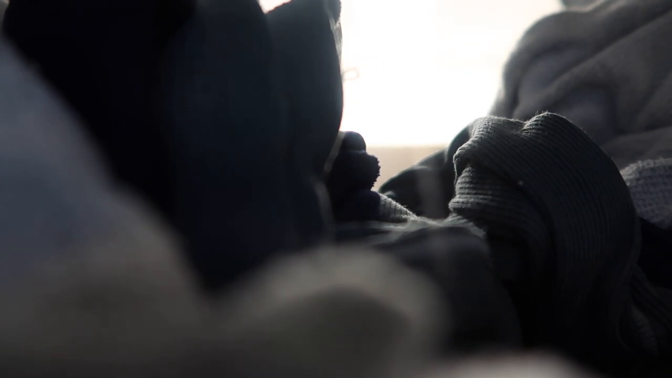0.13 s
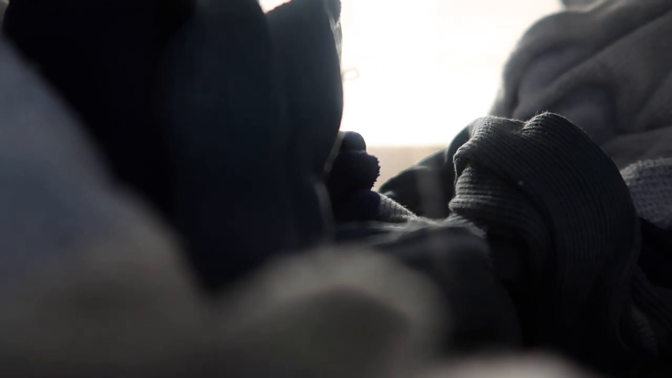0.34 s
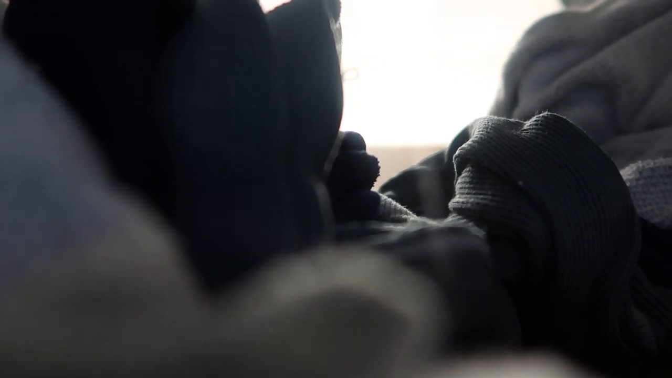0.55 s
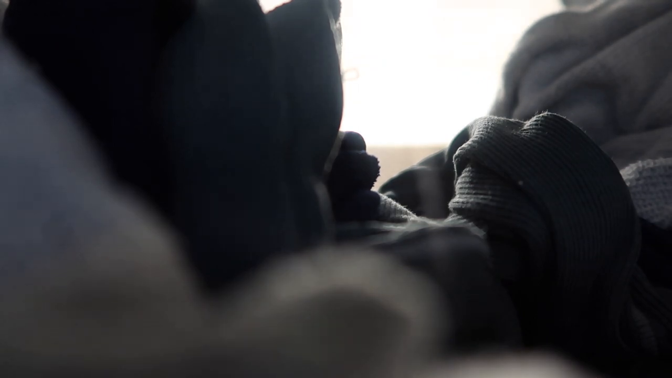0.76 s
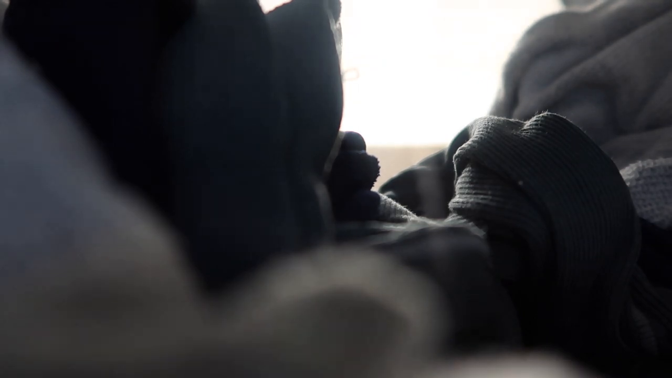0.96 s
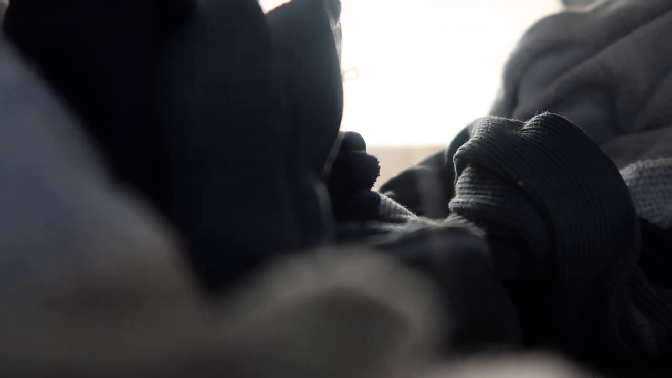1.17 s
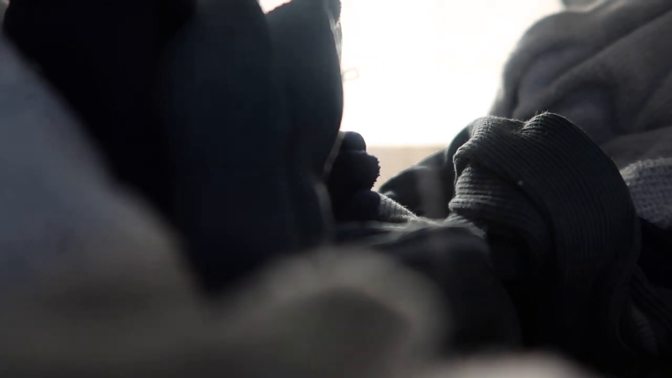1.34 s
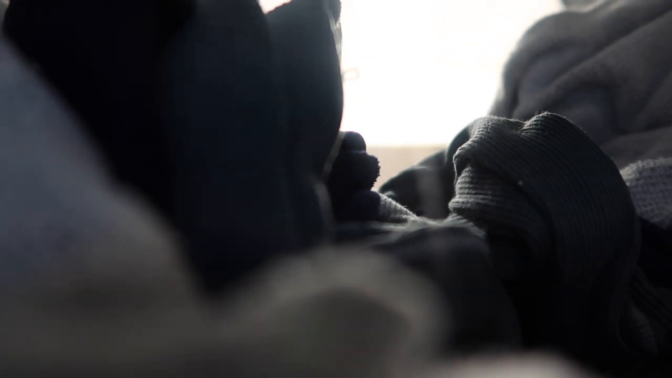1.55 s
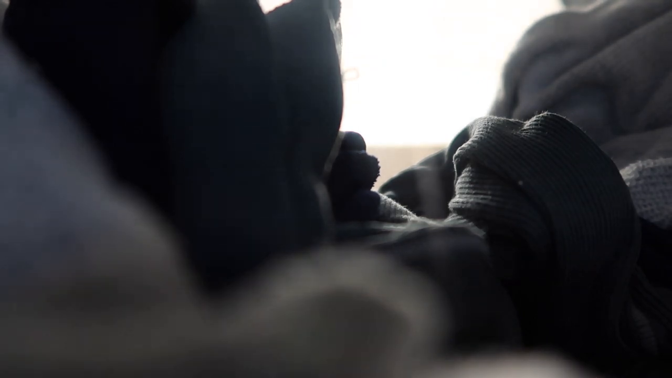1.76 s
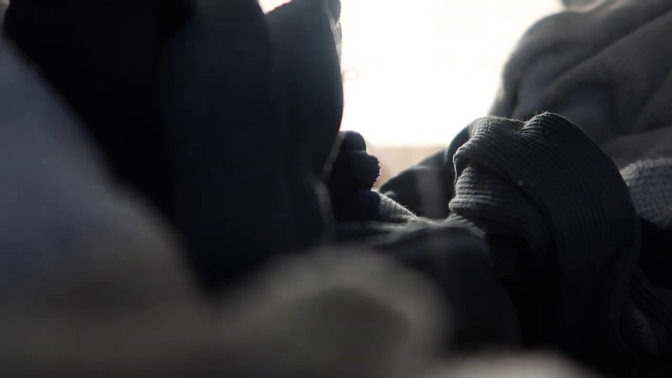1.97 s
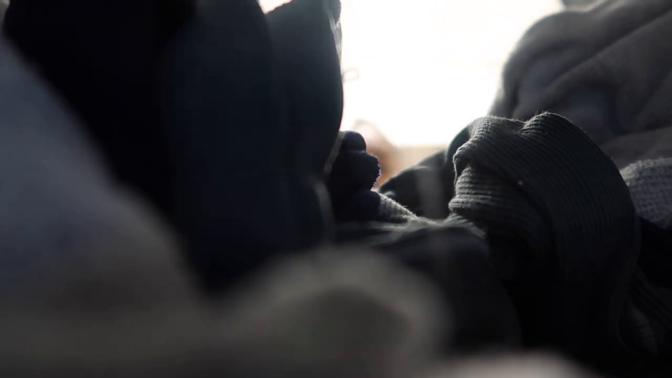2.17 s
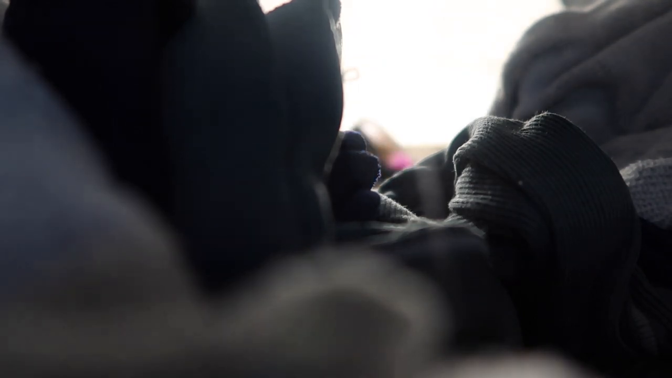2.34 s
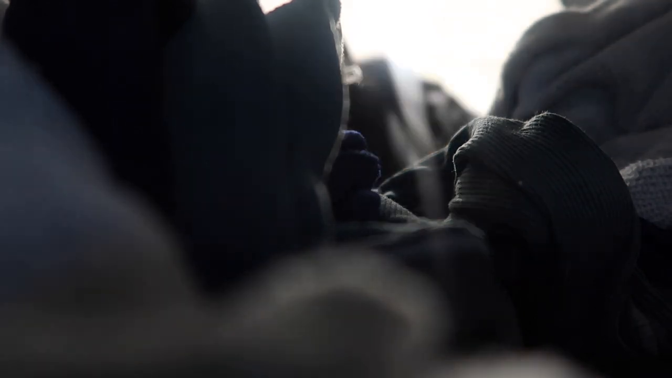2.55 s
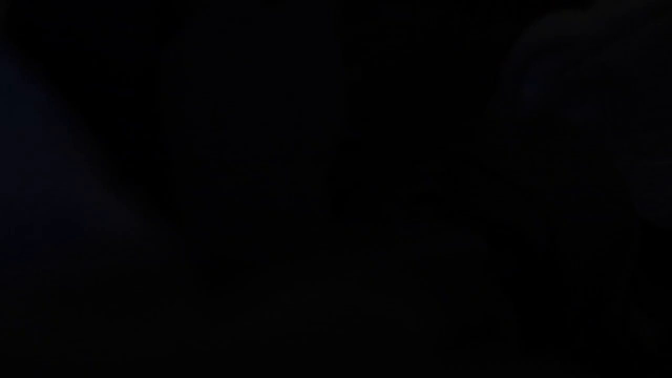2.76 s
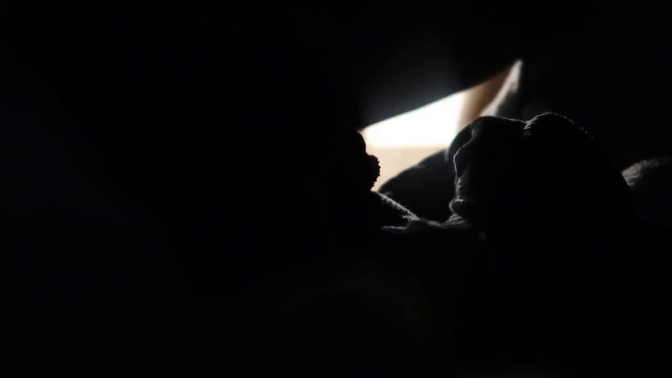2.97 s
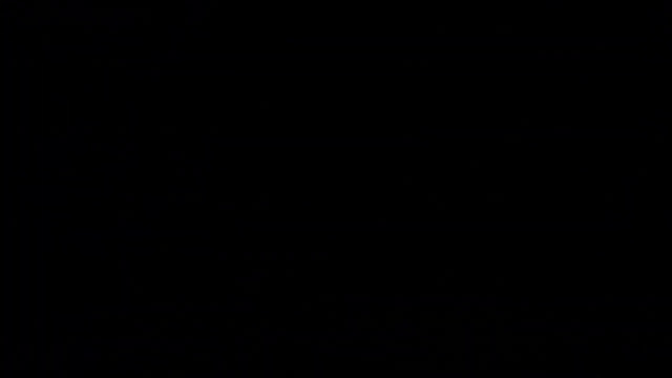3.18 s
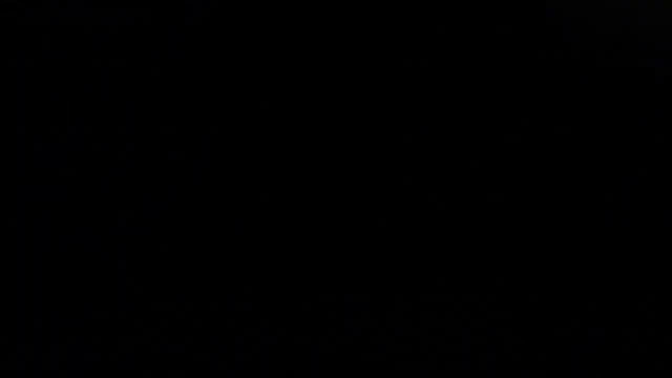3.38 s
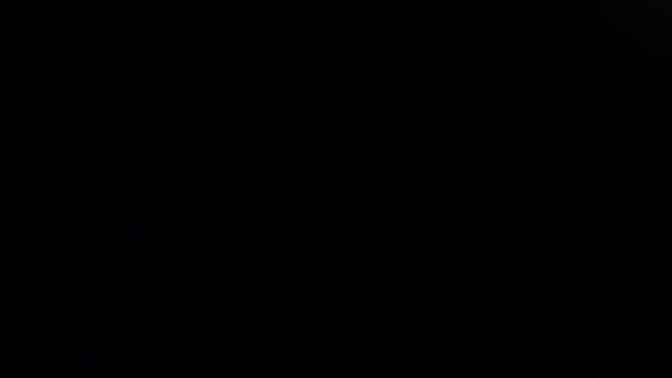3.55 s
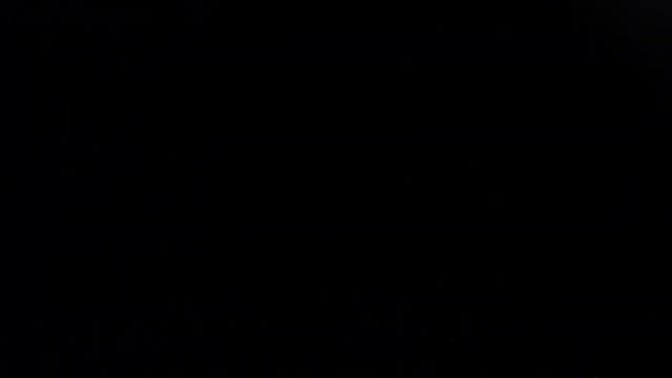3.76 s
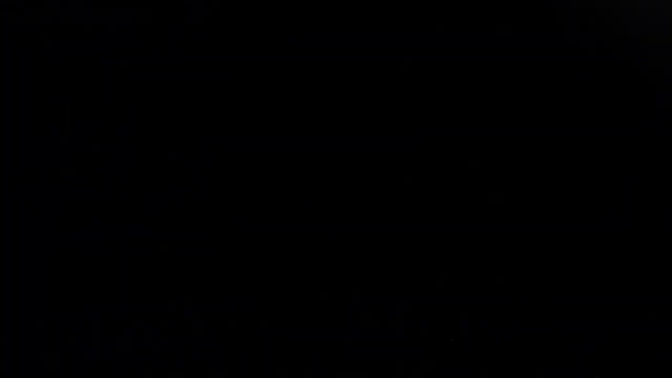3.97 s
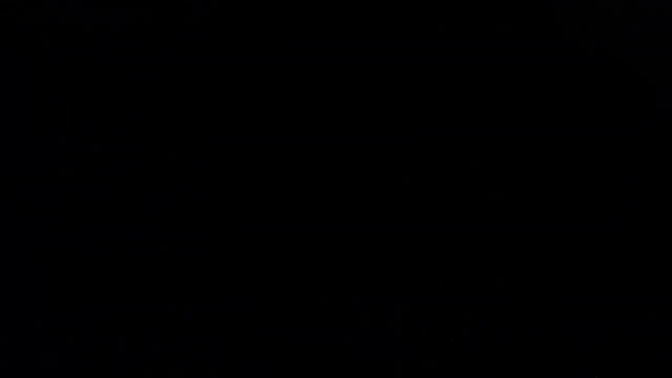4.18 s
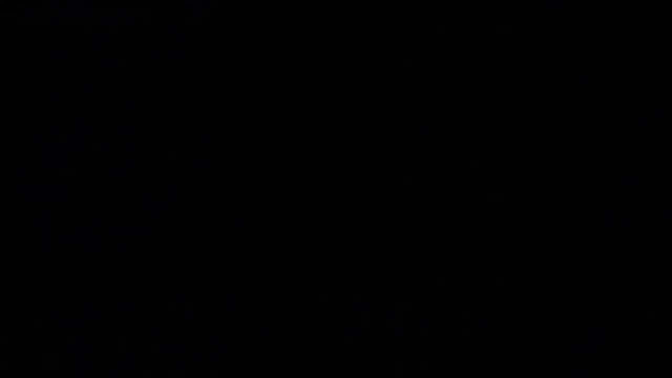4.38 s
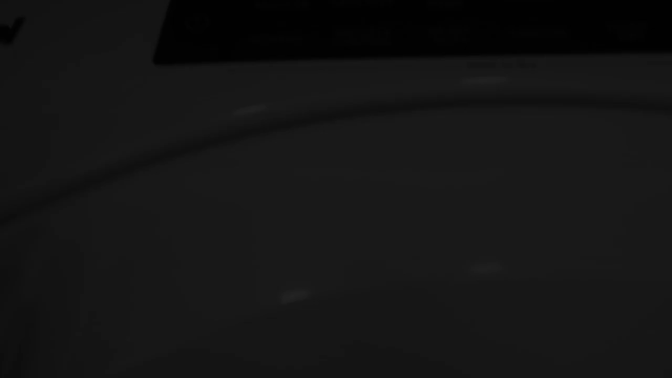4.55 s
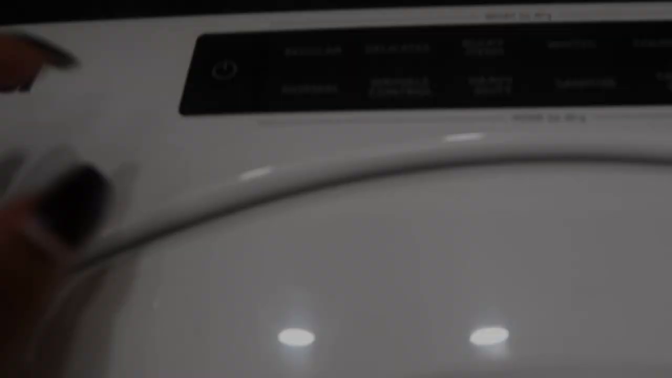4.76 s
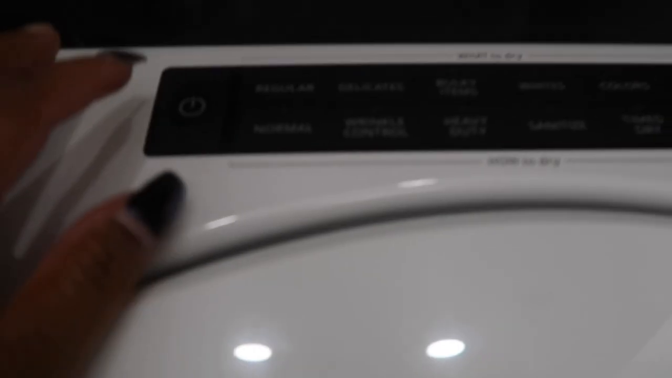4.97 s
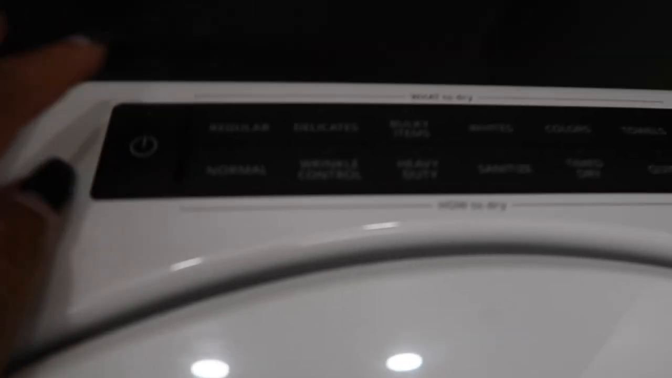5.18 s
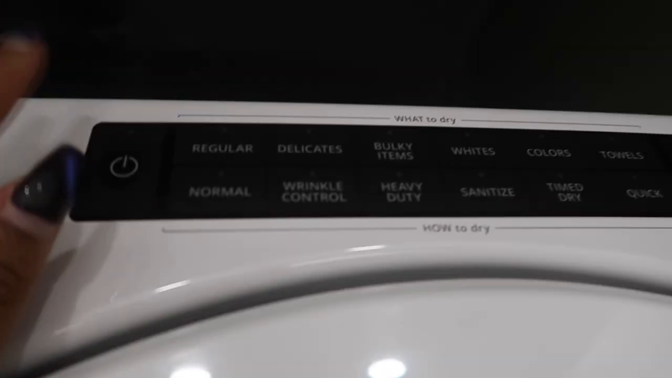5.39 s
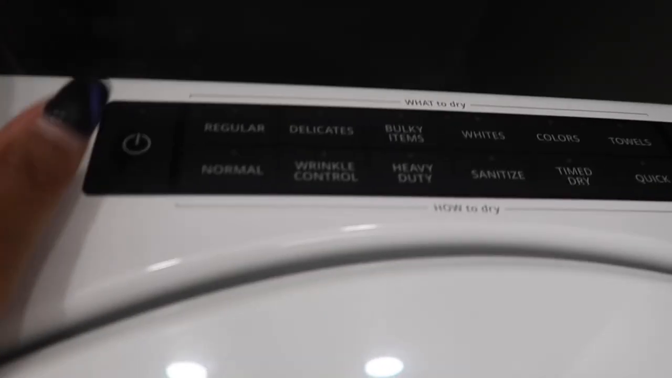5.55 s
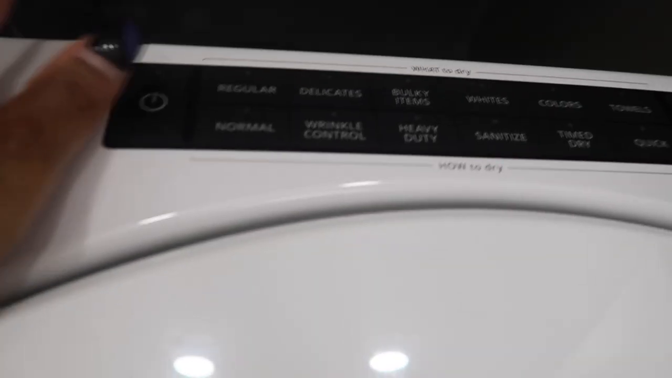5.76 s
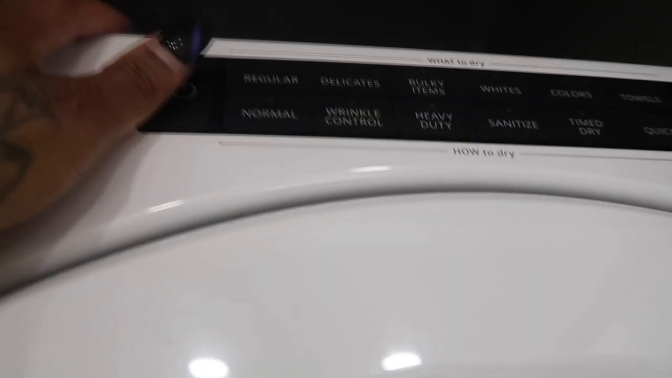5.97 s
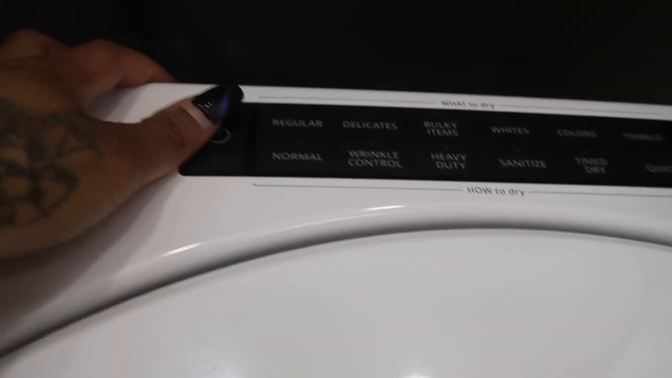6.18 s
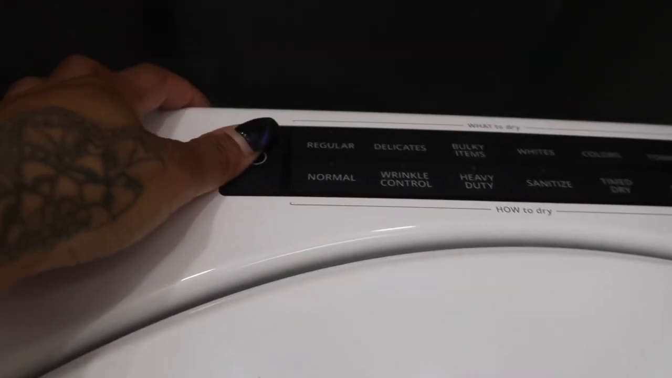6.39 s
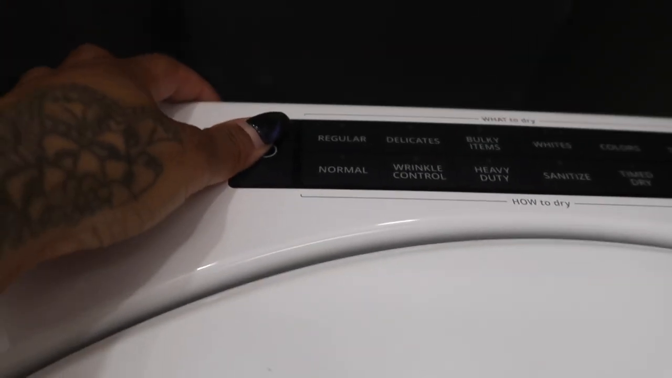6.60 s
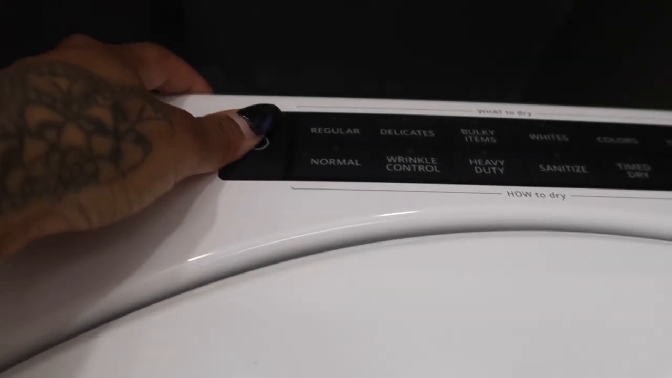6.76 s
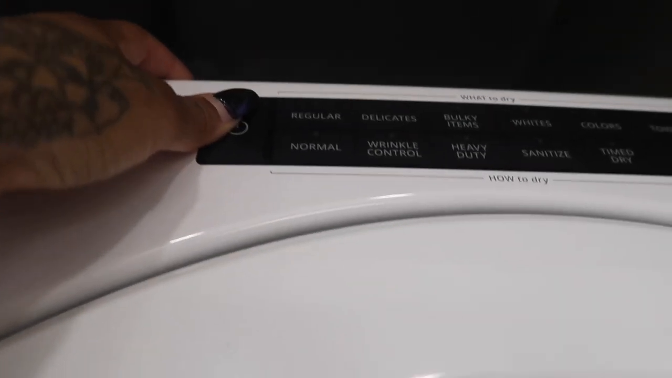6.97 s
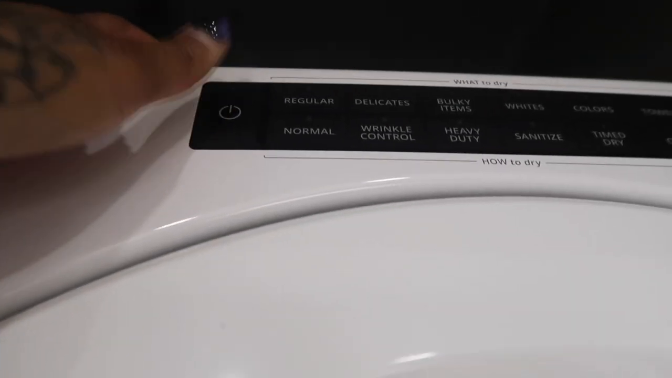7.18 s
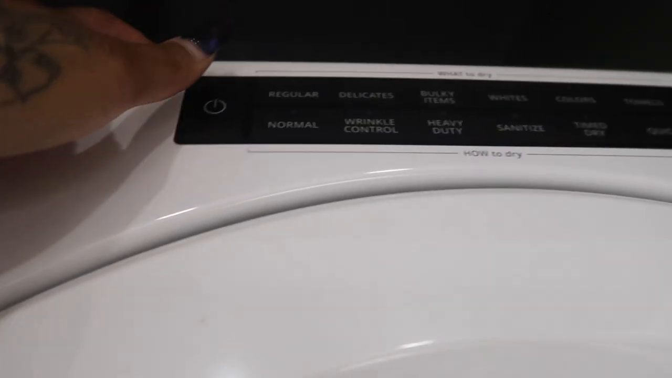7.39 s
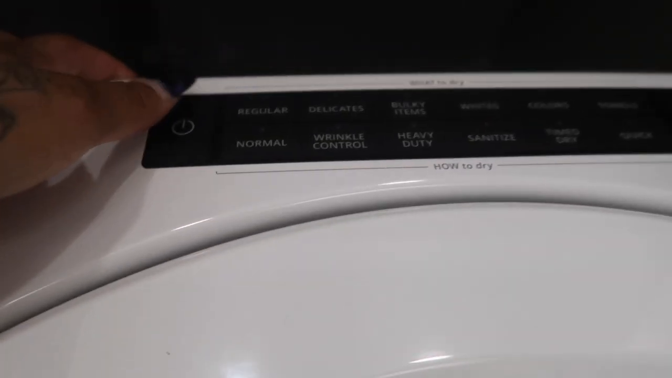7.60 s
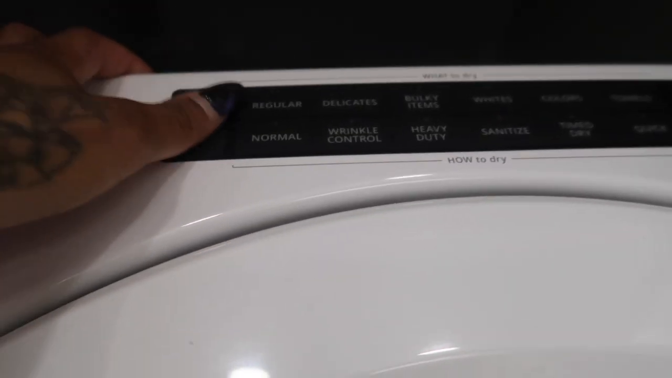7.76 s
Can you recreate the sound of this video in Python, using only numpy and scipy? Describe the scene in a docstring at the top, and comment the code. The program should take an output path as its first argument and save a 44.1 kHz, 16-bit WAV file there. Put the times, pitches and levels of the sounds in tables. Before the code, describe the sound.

The microphone lies among clothes inside a metal dryer drum: faint cloth rustle, low rumble, soft dull bumps. A fluttering swish swells as the door swings in, and it slams with a boomy, rattling burst and short metallic ring. The latch clacks and fabric drags; then, outside in a humming laundry room, a hand knocks and long nails click on a hollow panel with a light echo.

```python
"""Cloth rustles softly over a low rumble and hiss: a microphone lies among the clothes in a dryer drum.
The door swings in with a swish of fluttering noise, squeezes out a turbulent gust and slams, striking
damped steel modes that rattle and ring on. The latch clacks, and grainy friction marks the microphone
being dragged out into the humming laundry room. There a hand with long nails knocks, taps and scuffs on
a resonant control panel with a diffuse echo. Brief squeaks, decaying sine pulses, come now and then."""
import sys
import numpy as np
from scipy import signal
from scipy.fft import rfft, irfft, next_fast_len
from scipy.io import wavfile
from scipy.ndimage import uniform_filter1d

SR = 44100
rng = np.random.default_rng(int(sys.argv[2]) if len(sys.argv) > 2 else 0)


def to_wav(sig):
    """Store sig (one row per channel, or 1-D mono) as 16-bit WAV at the path in sys.argv[1].

    Samples outside -1..1 are clipped; the rate is SR.
    """
    pcm = np.clip(np.atleast_2d(sig), -1, 1) * 32767
    pcm = np.round(pcm).astype(np.int16)
    wavfile.write(sys.argv[1], SR, pcm.T)  # frames by channels


N = 345325
TIME = np.arange(N) / SR

# Modes of the steel cabinet. Each row: nominal frequency in Hz, relative level in dB, t60 in seconds.
CABINET_MODES = [(57.3, -6.5, 0.42), (113.2, -2.5, 0.17), (146, -7, 0.23), (182, -3.5, 0.15),
                 (209.6, -2, 0.15), (267.6, 0, 0.15), (311, -0.5, 0.074), (357.3, -6.5, 0.15),
                 (396, 0.5, 0.061), (460, 1.5, 0.04), (505, -8, 0.068), (588, -15, 0.09),
                 (653, -2.5, 0.039), (759, -9, 0.066), (932, -12, .12), (1150, -25, 0.12), (1470, -31, 0.2)]
# High, brief modes of the latch. Each row: nominal frequency in Hz, relative level in dB, t60 in seconds.
LATCH_RINGS = [(1275, -2, .06), (1520, -5, .05), (1610, -4, .055), (1880, -2, .06), (2406, -8, 0.061),
               (2625, -2, 0.081), (2760, 2, 0.055)]
# Colours of the dense high modes of door and panel. Each row: frequency in Hz, relative dB per Hz.
DOOR_RATTLE = [(150, -11.5), (400, -7), (700, 2.5), (1100, -1), (1600, -2.5), (2700, -7), (4000, -26),
               (8000, -61)]
PANEL_RATTLE = [(200, -51), (600, 3), (1200, 1), (1750, -2), (2300, -3), (3000, -10.5), (5000, -20.5),
                (10000, -49)]
# Colour of the first tick of a hard, light contact. Each row: frequency in Hz, relative dB per Hz.
HARD_TICK = [(1500, -4), (3200, 7.5), (5800, 3.5), (11000, -10), (15500, -23)]
# Stereo width of hits in the drum and in the room. Each row: frequency in Hz, side minus mid in dB.
DRUM_SPREAD = [(60, -34), (200, -6.5), (700, -10), (1800, -13.5), (3500, -1), (6500, 4), (10000, 11)]
ROOM_SPREAD = [(100, -31), (400, -18), (1000, -17), (2000, -10), (4000, -6), (10000, 6.5)]
# Strokes of cloth on cloth. Each row: peak time in seconds, rustle level in dB, drum air level in dB,
# fall time constant in seconds.
CLOTH_STROKES = [(.2, -62, -61, 0.46), (1.14, -61.5, -61.5, 0.4), (1.45, -53.5, -60.5, 0.28),
                 (1.87, -63, -60, .33), (4.13, -67, -60, 0.19)]


def door():
    """Impact excitation: slam and latch strike the cabinet's modes, and the steel drum reverberates."""
    # Each row: start in seconds, cabinet ring in dB, clatter in dB, tick in dB,
    # clatter time constant in seconds, resonance of the struck spot in Hz.
    slam_blows = [(3.161, -31, -28, -53, 0.0057, 950), (3.172, -12.5, -20, -43, 0.0055, 810),
                  (3.180, -23.5, -31.5, -41, 0.018, 2450), (3.194, -14.5, -26.5, -35.5, 0.014, 450),
                  (3.208, -23, -30, -45, 0.013, 1500), (3.220, -19.5, -33, -39, .012, 470),
                  (3.237, -24, -18, -33.5, 0.0026, 1080), (3.251, -7.5, -18, -37, .0035, 755),
                  (3.262, -16.5, -26.5, -40, 0.0054, 1520), (3.273, -12.5, -35, -41, .006, 400),
                  (3.289, -18.5, -30.5, -46.5, 0.012, 480), (3.303, -23, -29, -53, 0.01, 1430),
                  (3.319, -23, -27.5, -58, 0.011, 1000), (3.342, -15.5, -27, -50, 0.0094, 464),
                  (3.350, -17.5, -30.5, -45, 0.013, 1520), (3.386, -35, -32, -60, 0.006, 740)]  # the slamming door and its rebounds
    latch_blows = [(3.654, -35, -28, -37, 0.012, 1550), (3.795, -43, -42, -51.5, 0.014, 2270),
                   (3.855, -30, -36.5, -40, 0.011, 795), (3.880, -34, -41.5, -45, 0.013, 1910),
                   (4.466, -33.5, -49, -66, 0.014, 650)]  # clacks of the latch and knocks on the door
    # Colours of the blows. Each row: frequency in Hz, relative dB per Hz.
    latch_rattle = [(200, -8), (600, -4.5), (1400, 1), (2800, -5), (3600, -9.5), (5200, -14), (6500, -32),
                    (10000, -42)]
    door_tick = [(1500, -34), (3000, -2.5), (5000, -6.5), (6500, -12.5), (9000, -24), (15000, -36)]
    # Reverberation of the drum. Each row: frequency in Hz, t60 in seconds.
    drum_decay = [(80, 0.95), (300, 0.5), (800, 0.58), (1800, 0.58), (4000, 0.28), (9000, 0.17)]

    # the rubber seal cushions the slam: cabinet modes above this answer less
    seal_hz = 520
    cushioned = [(hz, db - 10 * np.log10(1 + (hz / seal_hz) ** 2), t60) for hz, db, t60 in CABINET_MODES]
    slam = strikes(slam_blows, cushioned, LATCH_RINGS, DOOR_RATTLE, door_tick, DRUM_SPREAD,
                   tick_share=2.2, high_db=-23, spot_db=-3, contact_s=0.00045)
    latch = strikes(latch_blows, CABINET_MODES, LATCH_RINGS, latch_rattle, door_tick, DRUM_SPREAD,
                    tick_share=0.46, high_db=-10.5, spot_db=-4, contact_s=0.0012)
    slam += shudder()
    # the slam's mid is dull: steep treble cut above about 7 kHz
    slam[0] = colour(slam[0], [(5500, -1.5), (7200, 0.5), (8500, -29), (12000, -33)])
    tail = ring_out(amp(-11.5) * slam + amp(-7) * latch, drum_decay, DRUM_SPREAD)
    # the tail is weakest around 200 Hz
    tail = colour(tail, [(70, 4.5), (200, -9.5), (400, 0.5)])
    return slam + latch + tail + thumps()


def shudder():
    """Repeated contact: a dense run of small impacts keeps the cabinet booming and the door chattering."""
    # Each row: peak time in seconds, boom in dB before its treble cut, chatter in dB,
    # fall time constant in seconds.
    shudder_swells = [(3.166, -29, -29.5, 0.033), (3.215, -33.5, -44, 0.018), (3.278, -31, -35, 0.022),
                      (3.335, -34, -34, .014), (3.375, -31, -41, .025)]
    # Treble cut of the boom. Each row: frequency in Hz, gain in dB.
    boom_cut = [(500, 0), (800, -0.5), (1500, -17), (4000, -43)]

    peaks = [(hz, 1.7 / t60, db) for hz, db, t60 in CABINET_MODES]  # width in Hz from damping
    boom = evened(resonate(grains(per_s=900, spread_db=3), peaks))
    boom = colour(boom, boom_cut)
    chatter = evened(colour(grains(per_s=2500, spread_db=2), DOOR_RATTLE))
    mid = swells(shudder_swells) * boom + swells(shudder_swells, column=2) * chatter
    return np.array([mid, np.zeros(N)])


def thumps():
    """Pressure pulses: pushes on the drum's air swell and fade smoothly while their pitch sinks."""
    # Pushes from handling and from the flexing door. Each row: start in seconds, peak in dB,
    # initial frequency in Hz, length in seconds.
    pushes = [(1.137, -25.5, 107.3, 0.072), (1.231, -30, 97, 0.21), (1.34, -19, 112, 0.12),
              (1.445, -27.5, 156, 0.05), (1.485, -26.5, 73, 0.096), (1.559, -32, 72, 0.14),
              (3.084, -26.5, 276.4, 0.062), (3.124, -23.5, 100, 0.057), (3.131, -26.5, 270, 0.048),
              (3.168, -16, 70, .022), (3.198, -15.5, 108, 0.034), (3.246, -4.5, 149, 0.022),
              (3.2487, -9, 563, 0.0042), (3.251, -8, 59, 0.04), (3.301, -7, 72, 0.026),
              (3.3454, -1.5, 72.6, 0.024), (3.677, -24, 103.4, 0.053), (3.868, -16.5, 95, 0.046),
              (3.963, -28, 83.5, 0.054), (4.195, -27.5, 77, 0.052)]
    skew = 0.81  # sets how far the peak lies from the middle of a push
    sag = 0.077  # share by which the pitch sinks

    mix = np.zeros((2, N))
    for s, db, hz, length in pushes:
        progress = np.linspace(0, 1, round(length * SR))
        turns = np.cumsum(hz * (1 - sag * progress)) / SR
        envelope = np.sin(np.pi * progress ** skew) ** 2
        add(mix[0], s, amp(db) * envelope * np.sin(2 * np.pi * turns))
    return mix


def swing():
    """Aerodynamic noise and friction: the fluttering swish of the door and the rustle of the clothes."""
    # Colour of the swish. Each row: frequency in Hz, relative dB per Hz.
    swish_colour = [(300, -8.5), (470, -10), (700, -2), (860, -5), (1050, -5.5), (1300, -7), (1700, -5.5),
                    (2900, -7.5), (5500, -17), (9000, -28), (13000, -69.5)]
    # Its stereo width. Each row: frequency in Hz, side minus mid in dB.
    swish_width = [(300, -27), (2400, -33), (3700, -7), (6000, -1), (9000, 5), (13000, 45), (15000, -11)]

    strokes = swells(CLOTH_STROKES) * flutter(depth_db=1.5, size=350)
    strength = stirring(rest_db=-66.5, swing_db=-38.5, strokes=strokes)
    air = patchy(wide_noise(swish_colour, swish_width), depth_db=2.5, size=6)
    return strength * air * flutter(depth_db=0.04, size=300)


def gust():
    """Turbulence: squeezed-out air hits the microphone ports unequally, so it sounds very wide."""
    # Puffs pressed out by the door. Each row: peak time in seconds, buffeting in dB, hiss in dB,
    # fall time constant in seconds.
    door_puffs = [(3.205, -19.5, -34.5, 0.029), (3.275, -16.5, -55, 0.023), (3.37, -36, -54, .025)]
    # Colours of buffeting and hiss. Each row: frequency in Hz, relative dB per Hz.
    buffet_colour = [(30, -15), (80, -3), (130, -4), (280, -1), (500, -14), (1200, -29), (4000, -49)]
    hiss_colour = [(800, -14), (2500, -12), (7000, 1), (12500, -4), (14500, -10), (16000, -37)]

    buffet = swells(door_puffs) * noise(buffet_colour)
    hiss = swells(door_puffs, column=2) * noise(hiss_colour) * flutter(depth_db=2, size=90)
    return np.array([np.zeros(N), buffet + hiss])


def panel():
    """Impact and modal radiation: a hand excites the hollow panel, and the laundry room echoes it."""
    # Knocks. Each row: start in seconds, panel ring in dB, clatter in dB, tick in dB,
    # clatter time constant in seconds, resonance of the struck spot in Hz, flex in dB, flex in Hz.
    hand_knocks = [(5.064, -23, -39, -43, 0.0062, 700, -17.5, 148),
                   (5.123, -33, -51, -60, 0.0072, 2100, -37, 540),
                   (5.143, -26.5, -44.5, -53, 0.0084, 3360, -35, 617),
                   (5.915, -44, -66, -75, .008, 900, -36, 145),
                   (7.058, -30, -34.5, -42, 0.0038, 1250, -28, 266),
                   (7.070, -34, -52, -65, 0.0082, 750, -32, 200),
                   (7.192, -34.5, -43, -70, 0.006, 2130, -42, 630),
                   (7.205, -39.5, -46, -70, 0.0048, 840, -43, 293),
                   (7.660, -36, -39, -55.5, 0.01, 1480, -43, 190)]
    # Fingernails on the trim. Each row: start in seconds, tick in dB, clatter in dB,
    # clatter time constant in seconds, resonance of the struck spot in Hz.
    nail_clicks = [(5.193, -30.5, -35.5, .0035, 4500), (5.250, -32.5, -44, 0.0034, 5000),
                   (5.276, -33, -32.5, 0.0043, 3700), (7.703, -55, -42, 0.012, 2320),
                   (7.718, -64, -56, .008, 2250), (7.748, -43.5, -42, 0.0095, 3640)]
    # Modes of the panel and of its plastic trim. Each row: nominal frequency in Hz,
    # relative level in dB, t60 in seconds.
    panel_modes = [(122, -4, 0.17), (160.4, -1, 0.32), (198, -13.5, 0.18), (266, 1, 0.11), (342, -3, 0.16),
                   (468, -4.5, 0.051), (543, -2.5, 0.054), (659, -3.5, 0.065), (820, -7.5, 0.066),
                   (920, -15, 0.07), (1180, -20, 0.049)]
    trim_modes = [(883, 2, 0.05), (1014, -12, 0.04), (1195, -7, 0.04), (1550, 9, 0.062), (1910, -3, 0.038),
                  (2220, 10, 0.05), (2870, -27, 0.027), (3470, -15, .025)]
    # Brief squeaks. Each row: start in seconds, peak in dB, frequency in Hz, rise in seconds.
    squeaks = [(.987, -41.5, 698, 0.0036), (1.09, -56.5, 706, 0.043), (1.72, -58.5, 1710, 0.063),
               (3.629, -30.5, 507, 0.0009), (4.883, -32, 1070, 0.0016)]
    # Reverberation of the room. Each row: frequency in Hz, t60 in seconds.
    room_decay = [(100, 0.23), (500, 0.45), (2000, 0.59), (5000, 0.54), (12000, 0.22)]
    nail_ring_db = -2.5  # relative to the tick
    flex_rise_s = 0.0041

    knocks = [blow for *blow, _, _ in hand_knocks]
    clicks = [(s, tick + nail_ring_db, clatter, tick, decay, hz)
              for s, tick, clatter, decay, hz in nail_clicks]
    hits = strikes(knocks + clicks, panel_modes, trim_modes, PANEL_RATTLE, HARD_TICK, ROOM_SPREAD,
                   tick_share=0.8, high_db=-12, spot_db=-4, contact_s=0.00041)
    # a small panel radiates little bass: cut below 115 Hz
    hits = signal.sosfilt(signal.butter(2, 115, "highpass", fs=SR, output="sos"), hits)
    flex = pulses([(s, db, hz, flex_rise_s) for s, *_, db, hz in hand_knocks])
    direct = hits + flex + judder() + scuffs() + pulses(squeaks)
    echo = ring_out(direct, room_decay, ROOM_SPREAD)
    return direct + colour(echo, [(150, -3.0), (1000, -7.5), (5000, -1.0)])


def judder():
    """Stick-slip friction: the hand catches on the sheet metal and shakes its modes unevenly."""
    # Strokes of the hand. Each row: peak time in seconds, lowest mode in dB and other modes in dB,
    # both before the filter, fall time constant in seconds.
    hand_strokes = [(5.089, -29, -39.5, 0.021), (5.126, -42, -30.5, .02), (5.168, -30, -33.5, .015),
                    (5.212, -35, -34, 0.014), (5.25, -33, -48, 0.022), (5.36, -42, -70, 0.045)]
    # Resonances of the sheet metal. Each row: frequency in Hz, width in Hz, relative level in dB.
    sheet_peaks = [(182, 25, 0), (346, 26, 1.5), (524, 52, -23), (595, 29, -3.5), (812, 26, -7),
                   (1370, 65, -24)]
    # Filter that dulls the judder. Each row: frequency in Hz, gain in dB.
    sheet_filter = [(600, -0.5), (850, -3.5), (1100, -7), (2000, -2.5), (4000, -12.5), (8000, -17)]

    slips = grains(per_s=1200, spread_db=1.0)
    lowest = evened(resonate(slips, sheet_peaks[:1]))
    others = evened(resonate(slips, sheet_peaks[1:]))
    shake = swells(hand_strokes) * lowest + swells(hand_strokes, column=2) * others
    return np.array([colour(shake, sheet_filter), np.zeros(N)])


def scuffs():
    """Sliding friction: fingers brush the trim with a hiss, part of it ringing in the plastic."""
    # Each row: start in seconds, overall level in dB.
    finger_scuffs = [(4.594, -49), (5.524, -47)]
    # Resonances of the trim. Each row: frequency in Hz, width in Hz, relative level in dB.
    trim_peaks = [(2300, 350, -17), (3230, 500, 7), (3730, 670, 5), (4900, 430, -4)]
    rise_s, decay_s, ring_db = 0.0027, 0.029, -3

    mix, t = np.zeros((2, N)), np.arange(SR // 2) / SR
    envelope = np.minimum(t / rise_s, 1) * np.exp(-t / decay_s)
    for s, db in finger_scuffs:
        sound = amp(-13) * wide_noise(HARD_TICK, ROOM_SPREAD, len(t))
        sound += amp(1) * wide_noise(PANEL_RATTLE, ROOM_SPREAD, len(t))
        sound[0] += amp(ring_db) * evened(resonate(rng.standard_normal(len(t)), trim_peaks))
        add(mix, s, amp(db) * sound * envelope)
    return mix


def handling():
    """Granular friction in the drum: fabric crinkles, the microphone drags, zips and buttons tick."""
    # Folding fabric, and the microphone dragged over the clothes and the rim of the drum.
    # Each row: peak time in seconds, level in dB, fall time constant in seconds.
    fabric_crinkles = [(2.285, -48.5, 0.059), (2.43, -53.5, 0.045), (2.83, -51, .03), (2.94, -44.5, .06),
                       (3.03, -44, 0.019), (4.3, -58, 0.12)]
    microphone_drags = [(3.96, -60, .04), (4.04, -48.5, 0.067), (4.125, -47.5, 0.077), (4.26, -55, 0.13),
                        (4.41, -47.5, .06), (4.452, -37.5, 0.022), (4.48, -41, 0.022)]
    # Their colours. Each row: frequency in Hz, relative dB per Hz.
    crinkle_colour = [(600, -30), (1100, -17), (1600, 2), (3000, 1), (5000, -10), (8000, -17), (12000, -47)]
    drag_colour = [(100, -3), (300, 1.5), (600, -5.5), (1100, -5), (1700, -10), (2600, -16), (4500, -31),
                   (9000, -59)]
    # Zips and buttons on the drum. Each row: start in seconds, cabinet ring in dB, clatter in dB,
    # tick in dB, clatter time constant in seconds, resonance of the struck spot in Hz.
    fastener_ticks = [(4.022, -57, -51, -63, .005, 4000), (4.055, -57, -51, -56, 0.0038, 3000),
                      (4.210, -60, -45, -41, 0.0027, 2900), (4.237, -60, -51, -48, .004, 2500)]

    crinkle = evened(colour(grains(per_s=2500, spread_db=1), crinkle_colour))
    drag = evened(colour(grains(per_s=5700, spread_db=2.0), drag_colour))
    friction = swells(fabric_crinkles) * crinkle + swells(microphone_drags) * drag
    ticks = strikes(fastener_ticks, CABINET_MODES, LATCH_RINGS, DOOR_RATTLE, HARD_TICK, DRUM_SPREAD,
                    tick_share=0.7, high_db=-7, spot_db=-2, contact_s=0.00056)
    return ticks + np.array([patchy(friction, depth_db=2.5, size=4), np.zeros(N)])


def cloth():
    """Cavity resonance: uneven rubbing of clothes and door sounds through the drum's air modes."""
    # Resonances of the drum's air. Each row: frequency in Hz, width in Hz, relative level in dB.
    air_peaks = [(686, 13, -1), (1036, 100, 5.5), (1667, 210, 3), (2030, 240, 1), (2870, 1300, -10)]

    rubbing = rng.standard_normal(N) * flutter(depth_db=1.3, size=700)
    voiced = colour(resonate(rubbing, air_peaks), [(3500, -2), (8000, -15.5), (11000, -37)])
    strength = stirring(rest_db=-69, swing_db=-46.5, strokes=swells(CLOTH_STROKES, column=2))
    return np.array([strength * evened(voiced), np.zeros(N)])


def rumble():
    """Low-frequency structural noise: the drum rumbles as the load shifts and the door moves."""
    # Shifts of the load. Each row: peak time in seconds, level in dB, fall time constant in seconds.
    load_shifts = [(.28, -39.5, 0.54), (1.48, -36.5, 0.28), (3.44, -40.5, .09), (3.78, -33.5, 0.23),
                   (4.04, -35, 0.11)]
    # Colour of the rumble. Each row: frequency in Hz, relative dB per Hz.
    rumble_colour = [(15, -43), (25, -35), (32, -9.5), (54, -9), (75, 1), (124, -7), (162, -13),
                     (178, -15.5), (220, -23.5), (236, -14), (255, -12), (330, -19.5), (357, -23.5),
                     (382, -28), (620, -52), (810, -61), (1360, -120)]

    strength = stirring(rest_db=-43.5, swing_db=-33, strokes=swells(load_shifts))
    return np.array([strength * noise(rumble_colour), np.zeros(N)])


def background():
    """Stationary noise: microphone hiss throughout, and a room hum that opens up outside the drum."""
    # Colours of the room hum, the mid hiss and the side hiss. Each row: frequency in Hz,
    # relative dB per Hz.
    hum_colour = [(20, -23), (58, 6.5), (85, -12), (120, 5.5), (200, -0.5), (330, -2.5), (480, -8),
                  (650, -15), (880, -15.5), (1200, -24.5), (2500, -32.5), (6000, -57)]
    mid_colour = [(30, 17), (300, 6.5), (700, -2), (2000, -8), (5000, -13.5), (8000, -20.5), (12000, -26),
                  (13200, -48)]
    side_colour = [(24, -43), (40, -39), (102, -5), (381, 0.5), (525, -6), (638, -9), (815, -9),
                   (2920, -19), (4010, -19), (5000, -23.5), (9690, -33), (13000, -30.5), (14000, -34)]
    # The hiss dips briefly after the slam. Each row: time in seconds, relative gain in dB.
    hiss_curve = [(0, 2), (3.2, 1.5), (3.5, -11), (4.0, -2), (4.7, 3), (7.8, 1)]

    outside = level([(0, -32), (4.1, -10), (4.6, -1), (6.5, -1), (7.3, 0.5), (7.8, 0.5)])
    hiss_gain = level(hiss_curve)
    mid = amp(-43.5) * outside * noise(hum_colour) + amp(-54) * hiss_gain * noise(mid_colour)
    side = amp(-57.0) * hiss_gain * noise(side_colour)
    return np.array([mid, side])


def door_motion():
    """Accelerated motion: the door is pushed to full speed (gain 1), coasts, and the frame stops it."""
    full_speed_s, stop_s = 2.957, 3.2
    push_db_per_s, coast_db_per_s, stop_db_per_s = 28, 19, 230
    early = np.maximum(full_speed_s - TIME, 0)
    late = np.maximum(TIME - full_speed_s, 0)
    stopped = np.maximum(TIME - stop_s, 0)
    return amp(-push_db_per_s * early - coast_db_per_s * late - stop_db_per_s * stopped)


def in_drum():
    """Enclosure: 1 while the microphone lies in the drum, fading to 0 as it is taken out."""
    leave_s, outside_s = 4.4, 4.61
    return np.interp(TIME, [leave_s, outside_s], [1, 0])


def stirring(rest_db, swing_db, strokes):
    """Incoherent addition: never-still clothes, door motion and single strokes add in power."""
    power = amp(rest_db) ** 2 + (amp(swing_db) * door_motion()) ** 2 + strokes ** 2
    return in_drum() * np.sqrt(power)


def strikes(rows, modes, high_modes, clatter, tick, width, tick_share, high_db, spot_db, contact_s):
    """Impact: each blow rings the body, sets small parts clattering and starts with a tick."""
    spot_q = 4.8  # sharpness of the resonance of a struck spot
    mix, t = np.zeros((2, N)), np.arange(SR // 2) / SR
    for s, ring_db, clatter_db, tick_db, decay, spot_hz in rows:
        parts = wide_noise(clatter, width, len(t))
        # each spot colours its clatter with a resonance of its own
        spot = resonate(rng.standard_normal(len(t)), [(spot_hz, spot_hz / spot_q, 0)], order=2)
        parts[0] += amp(spot_db) * evened(spot)
        sound = amp(clatter_db) * parts * np.exp(-t / decay)
        sound += amp(tick_db) * wide_noise(tick, width, len(t)) * np.exp(-t / (decay * tick_share))
        sound[0] += amp(clatter_db + high_db) * ringing(high_modes, t, spread_db=-4.0)
        sound *= 1 - np.exp(-t / contact_s)  # the surfaces take a moment to meet
        sound[0] += amp(ring_db) * ringing(modes, t, spread_db=2.0)
        add(mix, s, sound)
    return mix


def ringing(modes, t, spread_db):
    """Modal superposition: the place of a blow sets the strength and sign of each damped mode."""
    hz, mode_db, t60 = np.transpose(modes)[:, :, None]
    share = amp(mode_db + spread_db * rng.standard_normal(hz.shape)) * rng.choice([-1, 1], hz.shape)
    detune = 1 + 0.014 * rng.standard_normal(hz.shape)
    ring = (share * amp(-60 * t / t60) * np.sin(2 * np.pi * hz * detune * t)).sum(0)
    return ring * np.sqrt(2) / np.linalg.norm(share)


def pulses(rows):
    """Heavy damping: single resonances swell and die within moments."""
    mix, t = np.zeros((2, N)), np.arange(SR // 2) / SR
    for s, db, hz, rise in rows:
        envelope = t / rise * np.exp(1 - t / rise)
        add(mix[0], s, amp(db) * envelope * np.sin(2 * np.pi * hz * t))
    return mix


def ring_out(direct, t60, width):
    """Diffuse reverberation: noise reflections of the mid signal, each band dying at its own speed."""
    hz, t, z = signal.stft(rng.standard_normal((2, SR)), SR, nperseg=256)
    decay = amp(-60 * t / read(t60, hz)[:, None])
    build_up = 1 - np.exp(-t / 0.0011)
    tail = signal.istft(z * decay * build_up, SR, nperseg=256)[1]
    tail /= np.linalg.norm(tail[0])
    tail[1] = colour(tail[1], width)
    return signal.fftconvolve(direct[:1], tail, axes=1)[:, :N]


def resonate(x, peaks, order=1):
    """Resonance: parallel peaks (Hz, width in Hz, dB); a higher order has steeper skirts."""
    total = 0
    for hz, width, db in peaks:
        section = np.concatenate(signal.iirpeak(hz, hz / width, fs=SR))
        total = total + amp(db) * signal.sosfilt([section] * order, x)
    return total


def grains(per_s, spread_db):
    """Stick-slip: tiny slips at random moments, a few much stronger than the rest; rms 1."""
    strength = amp(spread_db * np.minimum(rng.exponential(1, N), 4)) * rng.standard_normal(N)
    return evened(strength * (rng.random(N) < per_s / SR))


def swells(rows, column=1):
    """Incoherent addition: exponential swells, their level in dB in the given column, add in power."""
    rise_share = 0.53  # a swell rises faster than it falls
    power = np.zeros(N)
    for row in rows:
        age = (TIME - row[0]) / row[-1]
        power += amp(row[column]) ** 2 * np.exp(-2 * np.maximum(age, -age / rise_share))
    return np.sqrt(power)


def patchy(x, depth_db, size):
    """Spectral modulation: each band flutters on its own, smoothed over size frames by size bins."""
    z = signal.stft(x, nperseg=512)[2]
    field = uniform_filter1d(rng.standard_normal(z.shape[-2:]), size, axis=0)
    field = uniform_filter1d(field, size, axis=1)
    return signal.istft(z * amp(depth_db * evened(field)), nperseg=512)[1][..., :N]


def flutter(depth_db, size):
    """Amplitude modulation: a random gain, depth_db rms, that changes over about size samples."""
    wander = uniform_filter1d(uniform_filter1d(rng.standard_normal(N), size), size)
    return amp(depth_db * evened(wander))


def wide_noise(spectrum, width, size=N):
    """Stereo decorrelation: independent coloured noises as a mid and side pair."""
    return np.array([noise(spectrum, size), colour(noise(spectrum, size), width)])


def noise(spectrum, size=N):
    """Spectral shaping: coloured noise of rms 1."""
    return evened(colour(rng.standard_normal(size), spectrum))


def colour(x, spectrum):
    """Linear filtering: multiplies the spectrum by a table of dB over frequency."""
    size = next_fast_len(x.shape[-1])
    gain = amp(read(spectrum, np.fft.rfftfreq(size, 1 / SR)))
    return irfft(rfft(x, size) * gain, size)[..., :x.shape[-1]]


def read(points, hz):
    """Logarithmic pitch scale: interpolates a table on a log-frequency axis."""
    f, value = np.transpose(points)
    return np.interp(np.log(hz + 1), np.log(f + 1), value)


def level(rows):
    """Level curve: gain over time from points in seconds and dB, joined linearly in dB."""
    return amp(np.interp(TIME, *np.transpose(rows)))


def amp(db):
    """Logarithmic level: decibels to amplitude gain."""
    return 10 ** (np.asarray(db) / 20)


def evened(x):
    """Power normalization: scales to rms 1."""
    return x / np.sqrt(np.mean(x ** 2) + 1e-20)


def add(mix, s, sound):
    """Superposition: mixes a sound in at time s in seconds."""
    part = mix[..., round(s * SR):][..., :sound.shape[-1]]
    part += sound[..., :part.shape[-1]]


def scene():
    """Superposition: all sources add as mid and side, then turn into left and right."""
    mid, side = door() + swing() + gust() + panel() + handling() + cloth() + rumble() + background()
    return np.array([mid + side, mid - side])


def record(dry):
    """Transduction: the microphone's bass roll-off, soft overload on big peaks, then the band limit."""
    low_cut_hz, edge_hz = 24, 15700
    ceiling = 1.05  # amplitude that the overload approaches
    heard = signal.sosfilt(signal.butter(1, low_cut_hz, "highpass", fs=SR, output="sos"), dry)
    held = ceiling * np.tanh(heard / ceiling)
    band_limit = signal.firwin(511, edge_hz, window=("kaiser", 9), fs=SR)
    return signal.oaconvolve(held, band_limit[None], "same")


dry = scene()
out = record(dry)
to_wav(out)
```